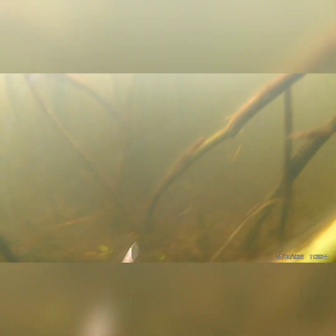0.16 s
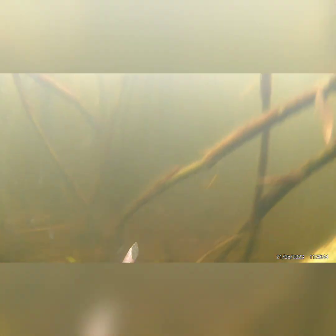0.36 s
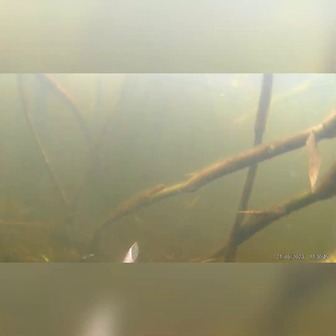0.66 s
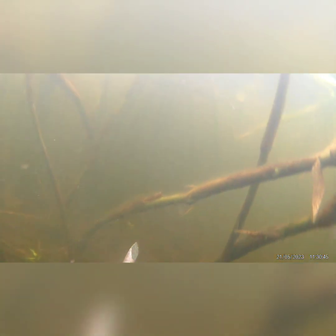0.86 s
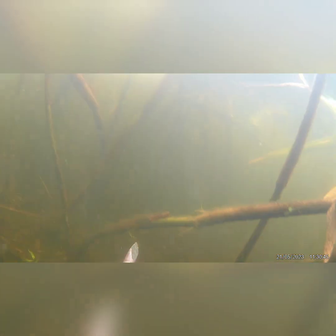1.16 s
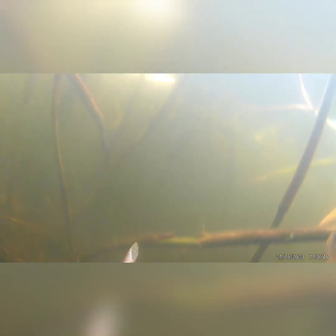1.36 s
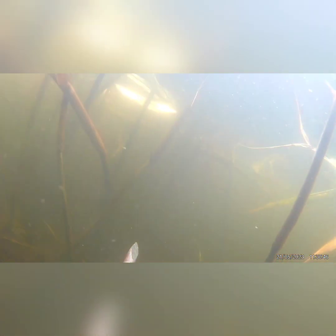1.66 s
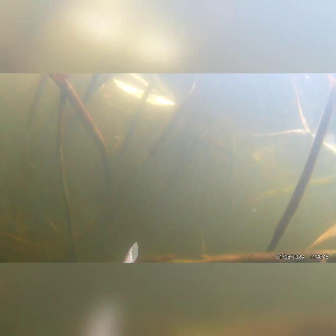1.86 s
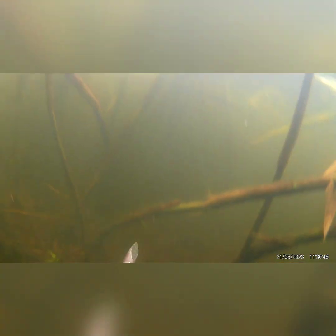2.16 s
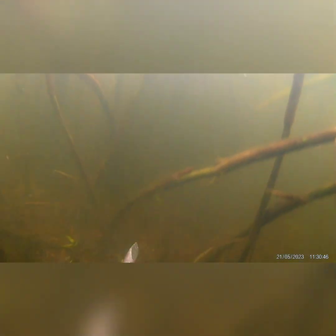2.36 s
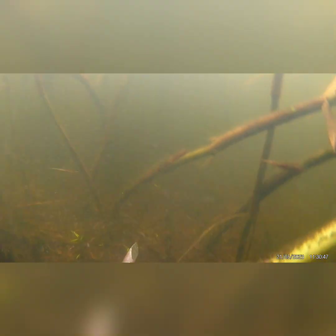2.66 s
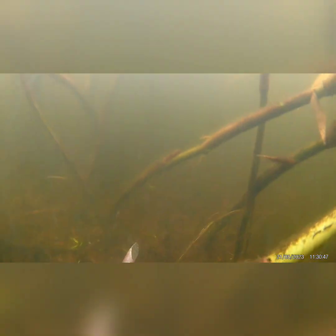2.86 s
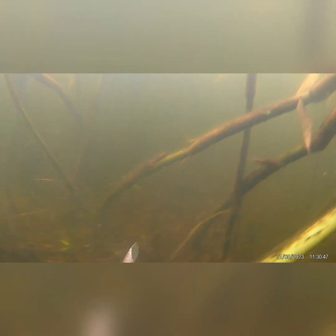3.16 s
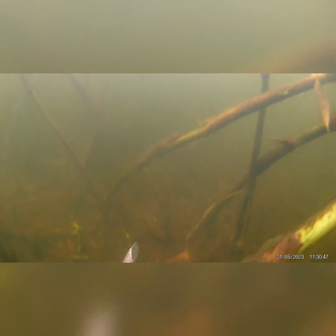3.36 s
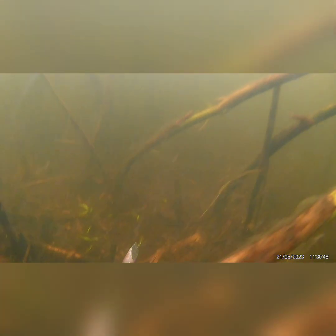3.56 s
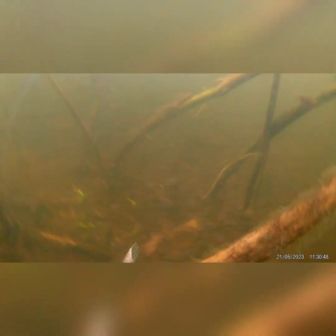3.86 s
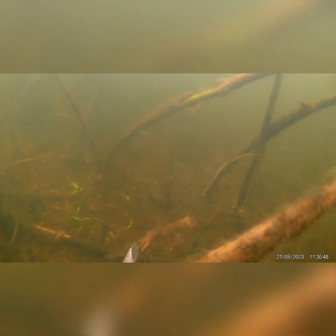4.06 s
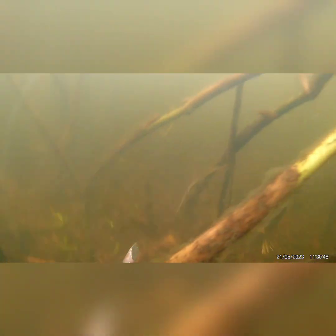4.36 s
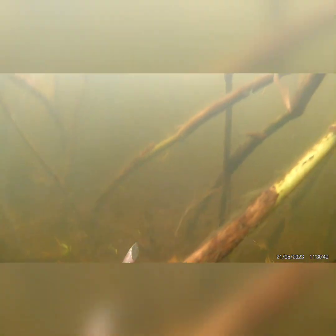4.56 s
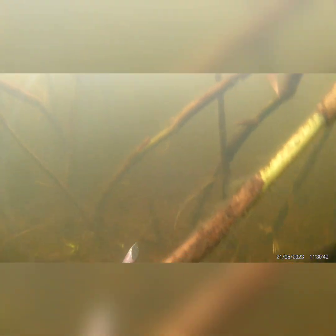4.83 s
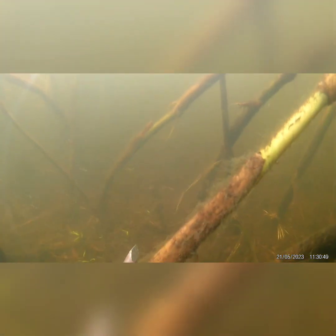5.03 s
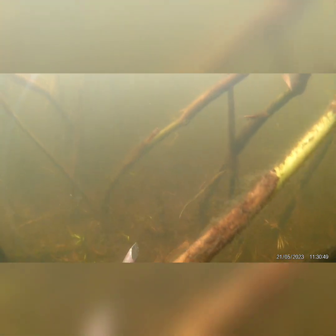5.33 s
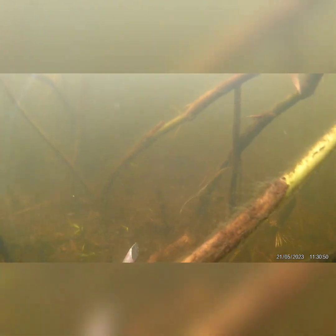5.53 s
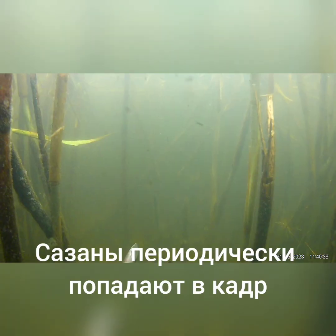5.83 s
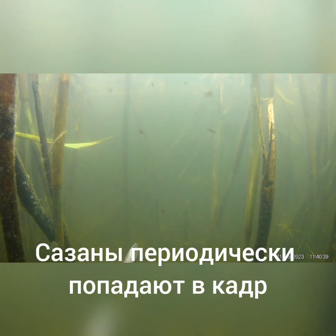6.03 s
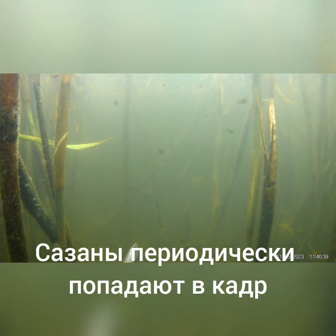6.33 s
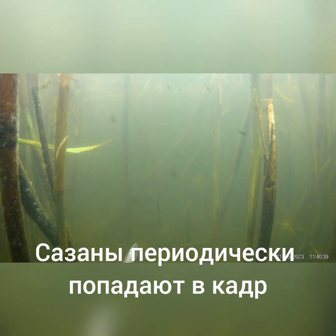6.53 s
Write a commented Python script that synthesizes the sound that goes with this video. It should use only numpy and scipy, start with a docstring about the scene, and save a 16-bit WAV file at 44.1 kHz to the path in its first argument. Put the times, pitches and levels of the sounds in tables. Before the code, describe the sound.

Muffled underwater rumble with deep soft booms and hollow plastic knocks and rubs, growing rougher, then a brief dropout and quiet hiss with one tiny bubble.

```python
"""Among sunken reeds, a camera in a plastic housing drifts underwater. Damped sines near 60 Hz boom as it
is bumped; knocks ring short modes of its lid, rim, back, shell and clack; noise through the same modes
gives the wash of water and the rub of stalks. A stalk squeaks in two slides of harmonic tone. The sound
drops out briefly, then resumes in stiller water, where a small bubble chirps upward over a steady hiss."""
import sys
import numpy as np
from scipy import signal
from scipy.fft import rfft, irfft
from scipy.io import wavfile
from scipy.ndimage import uniform_filter1d

SR = 44100
rng = np.random.default_rng(int(sys.argv[2]) if len(sys.argv) > 2 else 0)


def dump(signal):
    """Clip the signal to [-1, 1] and save it as 16-bit WAV at the path in sys.argv[1]."""
    limited = np.clip(np.atleast_2d(signal).T, -1, 1)
    pcm = np.round(limited * 32767).astype(np.int16)
    wavfile.write(sys.argv[1], SR, pcm)


N = 295029
T = np.arange(N) / SR  # s

# modes of the housing by part: f/Hz, relative level/dB, t60/s of the free ring
LID = [(443, 1.5, 0.061), (397, -12.5, 0.062)]
RIM = [(629.2, 0, 0.036), (692, -5, 0.034), (841, -8, 0.039), (1067, -12.5, 0.01)]
BACK = [(296.6, 4.5, 0.076), (226, -1.5, 0.054)]
SHELL = [(1237, -4.5, .03), (1567, 5.5, 0.013), (1745, 8.5, 0.017), (1849, -12.5, .02), (2315, -11, 0.016),
         (2660, -22, 0.026)]
# the same for the hard clack, as a hard blow sounds it
CLACK = [(2950, -4, .007), (3550, -5, .005), (4200, -2, .006), (4900, -5, .004), (5550, 0, .005),
         (6300, 0, .0045), (7000, -12, .004), (9300, -21, .004), (12000, -24, .0025)]
# water moving past the housing: t/s, sway level/dB, wash level on the body/dB, shell over body/dB
FLOW = [(0, -37, -55, -8), (.2, -36, -52, -35), (.38, -45.5, -63, -13.5), (.85, -52, -61, -13),
        (1.1, -60.5, -68, -9), (1.65, -53, -69, -13.5), (2.1, -54, -67, -11.5), (2.35, -46.5, -66.5, -5.5),
        (2.63, -52, -64, -6), (2.75, -60.5, -65, -16), (2.85, -44, -58.5, -15.5), (3.3, -41.5, -62, -14.5),
        (3.9, -44, -61.5, -17), (4.15, -33, -59.5, -18.5), (4.5, -36, -52, -23), (4.74, -28.5, -54.5, -20),
        (4.86, -41, -57.5, -16), (5.0, -29.5, -58, -19), (5.2, -49, -58, -23), (5.49, -42, -60, -13),
        (5.65, -69.5, -54.5, -24.5), (6.16, -76.5, -59, -22), (6.54, -57, -62, -17.5),
        (6.69, -61.5, -64.5, -18)]


def undb(db):
    """Amplitude factor of a level in dB."""
    return 10 ** (np.asarray(db) / 20)


def level(x, db):
    """Set the rms level in dB."""
    return x * undb(db) / np.sqrt(np.mean(x ** 2))


def band(x, hz, width_hz):
    """Two-pole resonance, gain 1 at the centre."""
    return signal.lfilter(*signal.iirpeak(hz, hz / width_hz, SR), x)


def walk(rate):
    """Random levels held 1 / rate s and smoothed twice into slow slides; spread near 1."""
    hold = int(SR / rate)
    steps = np.repeat(rng.standard_normal(N // hold + 1), hold)
    return 1.5 * uniform_filter1d(uniform_filter1d(steps, hold), hold)[:N]


def add(out, s, sound):
    """Mix a sound in at s seconds."""
    i = int(s * SR)
    out[i:i + len(sound)] += sound[:N - i]


def parts_db(body_db, lid_over_back_db, shell_over_db, clack_over_db, rim_db):
    """Levels of lid, rim, back, shell and clack from where and how hard the housing is touched."""
    lid = body_db + np.minimum(lid_over_back_db, 0)
    back = body_db - np.maximum(lid_over_back_db, 0)
    shell = body_db + shell_over_db
    rim = lid + 0.45 * (shell - lid) + rim_db  # the rim sounds between lid and shell
    return np.array([lid, rim, back, shell, shell + clack_over_db])


def hiss():
    """Steady noise of water and microphone, shaped in its spectrum."""
    # noise colour: f/Hz, relative level per Hz/dB
    colour = [(12, -32.5), (20, 0), (65, -8.5), (85, -3.5), (123, -12.5), (354, -19), (455, -21.5),
              (523, -25), (1550, -31), (1730, -34.5), (2630, -37.5), (7820, -48.5), (15700, -48)]
    hz, db = np.transpose(colour)
    f = np.maximum(np.fft.rfftfreq(N, 1 / SR), 1)
    gain = undb(np.interp(np.log(f), np.log(hz), db))
    return level(irfft(rfft(rng.standard_normal(N)) * gain, N), -58)


def sway():
    """The flow rocks the whole housing: noise through low resonances, swelling with the water."""
    sway_db = np.interp(T, np.array(FLOW)[:, 0], np.array(FLOW)[:, 1])
    flow = rng.standard_normal(N)
    boom = level(band(band(flow, 57, 7), 57, 43), 0)
    under = level(band(band(flow, 37, 12), 37, 30), -9.5)
    return undb(sway_db) * (boom + under)


def rubbed(modes, slips_per_s, smear, flicker_db, evenness):
    """Tiny random slips over turbulence excite a part's modes, damped by the contact; each mode flickers."""
    slips = (rng.random(N) < slips_per_s / SR) * rng.standard_normal(N)
    push = level(slips, 0) + 0.73 * rng.standard_normal(N)
    y = 0
    for hz, db, t60 in modes:
        width = smear / t60  # Hz; more smear, more damping
        mode = band(band(band(push, hz, width), hz, width), hz, 3 * width)
        # evenness below 1 pulls the mode levels together
        y = y + level(mode, db * evenness) * undb(flicker_db * walk(40))
    return level(y, 0)


def rub():
    """Water washes over the parts throughout; stalks slide along them stroke by stroke."""
    # sliding stalks: start t/s, length/s, body level/dB rms, lid over back/dB, shell over body/dB,
    # clack over shell/dB, rim emphasis/dB
    strokes = [(0.055, 0.075, -49.5, 2, -16.5, -5.5, 9), (0.132, 0.076, -45.5, 5, -22.5, -7, 6),
               (0.189, 0.078, -43.5, 3.5, -25.5, -15, 5), (0.271, 0.064, -43, 11, -26, -7, 6.5),
               (0.324, 0.049, -46.5, -10, -31, -17, 4), (0.603, .12, -55, 3.5, -28, -22, 4.5),
               (.71, 0.11, -69, 0, -3, -22, -4), (0.854, 0.052, -55.5, 4, -20, -22, 2),
               (.98, 0.074, -62, -11, -16, -13, 5), (2.18, 0.3, -53, -15, -32, -30, -8),
               (2.676, 0.08, -43.5, 1, -45, -15, 0.5), (2.742, 0.12, -41, 6, -29, -30, -4),
               (2.866, 0.059, -43, 7.5, -35, -19, 1.5), (2.958, 0.031, -42, 3.5, -35, -15.5, -4),
               (3.021, 0.083, -44, -2, -26.5, -19, -1), (3.2, .036, -36, 8.5, -32.5, -21, -4),
               (3.234, 0.11, -44.5, -15.5, -23, -27, 0), (3.533, 0.1, -48, -3, -27, -12, 3),
               (3.589, .045, -40, 12, -37, -14, 3), (3.735, .038, -31, -11.5, -29, -37, 2),
               (3.776, 0.058, -43, -9, -29.5, -27, -8), (3.844, 0.11, -38, -10.5, -25, -24.5, 0),
               (3.95, 0.11, -45, -9.5, -36, -19, -3), (4.075, 0.038, -46, -8, -19.5, -32.5, 2),
               (4.111, 0.056, -56.5, 17.5, -2.5, -34, -9), (4.205, 0.012, -37.5, -4.5, -9.5, -7.5, 3),
               (4.216, 0.032, -45, 18, -16, -26.5, 1), (4.262, .048, -39, -3, -10.5, -45, 0.5),
               (4.32, 0.064, -51.5, 4, -9, -28, -5), (4.379, 0.053, -43.5, 5, -3, -37, 1),
               (4.44, 0.042, -40, -2.5, -8.5, -13.5, -2), (4.638, 0.028, -38.5, -11, -14.5, -18.5, -5),
               (4.669, 0.025, -33, 5.5, -26.5, 1, 2.5), (4.702, 0.024, -35, -3, -39, 4, 3),
               (4.782, .057, -40.5, -0.5, -24, -7, -6), (4.825, .1, -42, -26, -27.5, -13, -15),
               (4.99, .17, -53.5, -7.5, -26.5, -9, 5), (5.212, 0.037, -41, -15, -24.5, -4, -5),
               (5.25, .08, -52.5, 16, -33, -18, -1.5), (5.336, 0.088, -48, -7, -20, -24, 1.5),
               (5.42, 0.077, -52.5, -1.5, -9, -23, -4)]
    # flicker depth of lid, rim, back, shell and clack/dB
    flicker = (1.8, 1.8, 1.8, 2.2, 2.2)
    s, _, wash_db, shell_over_db = np.transpose(FLOW)
    # lid over back 2 dB, rim emphasis 1 dB
    wash = parts_db(np.interp(T, s, wash_db), 2, np.interp(T, s, shell_over_db), 0, 1)
    wash[-1] = -91.5  # dB; water barely stirs the clack
    power = undb(wash) ** 2
    for start, length, *touch in strokes:
        power[:, int(start * SR):int((start + length) * SR)] += undb(parts_db(*touch))[:, None] ** 2
    # 13 ms smoothing eases each stroke in and out
    lid, rim, back, shell, clack = uniform_filter1d(np.sqrt(power), int(.013 * SR), axis=1)
    return (lid * rubbed(LID, 360, 5.2, flicker[0], 0.78)
            + rim * rubbed(RIM, 500, 5, flicker[1], 0.87)
            + back * rubbed(BACK, 330, 9.2, flicker[2], 0.4)
            + shell * rubbed(SHELL, 600, 5.0, flicker[3], 0.72)
            + clack * rubbed(CLACK[:3], 900, 2.5, flicker[4], 0.029))


def bubble():
    """A rising chirp whose octave fades out early in the climb."""
    # path of the chirp: t/s, f/Hz, level of the fundamental/dB
    chirp = [(6.085, 933, -78.5), (6.095, 1015, -55.5), (6.108, 1094, -68), (6.118, 1245, -51),
             (6.126, 1504, -71), (6.134, 1950, -63), (6.138, 2100, -85)]
    s, hz, db = np.transpose(chirp)
    phase = 2 * np.pi * np.cumsum(np.interp(T, s, hz)) / SR
    octave = 1.1 * np.clip((s[3] - T) / 0.037, 0, 1)
    tone = np.sin(phase) + octave * np.sin(2 * phase)
    return undb(np.interp(T, s, db, -200, -200)) * tone


def squeaks():
    """A stalk's uneven stick-slip on the shell: a rough tone, its first two harmonics equally strong."""
    # two slides: t/s, mean slip rate f/Hz, level ahead of the harmonic balance/dB
    slides = [(4.231, 1020, -79), (4.245, 962, -48.5), (4.258, 873, -61), (4.267, 783.5, -46),
              (4.284, 687.5, -33), (4.295, 736, -38.5), (4.305, 886, -45), (4.313, 900, -88),
              (4.37, 860, -85), (4.381, 853, -56), (4.399, 751, -56), (4.406, 787, -41.5),
              (4.419, 828, -38.5), (4.433, 820, -50), (4.44, 800, -99)]
    s, hz, db = np.transpose(slides)
    slip_hz = np.interp(T, s, hz) * (1 + 0.013 * walk(460))
    phase = 2 * np.pi * np.cumsum(slip_hz) / SR
    tone = 0
    for k, harmonic_db in enumerate([-1.0, -1, -15, -33.5], start=1):
        tone = tone + undb(harmonic_db + 2 * walk(150)) * np.sin(k * phase)
    return undb(np.interp(T, s, db, -200, -200)) * tone


def thumps():
    """Soft bumps set the whole housing into damped rocking that starts a little fast and settles."""
    # bumps: t/s, level at the start of the decay/dB, settled f/Hz, t60/s
    bumps = [(0.047, -46, 54, 0.25), (0.2, -26.5, 61.26, 0.74), (0.248, -34, 63, 0.52),
             (0.577, -37.5, 62.7, 0.63), (0.959, -43.5, 67.2, 0.96), (1.461, -46, 63, 0.7),
             (1.702, -44, 64.2, 1), (2.204, -30.5, 60.1, 0.43), (2.307, -38, 64, 0.81),
             (2.657, -21, 70.8, 0.29), (2.67, -10, 61.3, 0.74), (2.936, -32, 70.8, 0.79),
             (3.289, -27.5, 56.8, 1), (3.522, -23, 61, 0.88), (3.765, -21, 63.5, 0.42),
             (3.906, -10.5, 56, 0.26), (3.945, -18.5, 61.75, 0.79), (4.091, -33.5, 59.2, 0.35),
             (4.208, -21.5, 71, 0.41), (4.437, -17, 75.35, 0.23), (4.45, -3.5, 63, 0.13),
             (4.466, -6.5, 57.2, 0.35), (4.557, -24, 62.9, 0.35), (4.673, -16.5, 57.7, 0.18),
             (4.716, -28, 61, 0.36), (4.801, -39, 67.3, 0.5), (4.963, -15, 75, 0.095),
             (5.217, -5.5, 61.2, 0.37), (5.389, -27.5, 60.9, 0.39), (6.61, -47, 52.4, 0.45)]
    out, t = np.zeros(N), T[:SR]
    for s, db, hz, t60 in bumps:
        turns = hz * (t + 0.00092 * (1 - np.exp(-t / 0.022)))
        onset = 1 - np.exp(-t / 0.0015)
        add(out, s, undb(db - 60 * t / t60) * np.sin(2 * np.pi * turns) * onset)
    return out


def ring(modes, chance, rise_s, detune):
    """One blow on one part; where it lands shifts the balance of the modes. Peak 1."""
    t = T[:SR // 8]
    hz, db, t60 = np.transpose(modes)[:, :, None]
    scatter_db = 3 * chance[:len(modes), None]
    pitch = hz * (1 + detune * chance[-len(modes):, None])
    y = np.sum(undb(db + scatter_db - 60 * t / t60) * np.sin(2 * np.pi * pitch * t), axis=0)
    y *= np.sin(np.pi / 2 * np.minimum(t / rise_s, 1)) ** 2  # the push builds up over the contact
    return y / np.abs(y).max()


def dulled(modes, softness_db):
    """A soft blow leaves the upper modes weak."""
    hz, db, t60 = np.transpose(modes)
    loss_db = 0.45 * max(softness_db, 0) * np.log2(hz / hz[0])  # grows per octave above the first mode
    return np.transpose([hz, db - loss_db, t60])


def crunch(y, grit):
    """A rough surface lands as a quick burst of tiny contacts. Peak 1."""
    burst = grit * np.exp(-T[:len(grit)] / 0.0002)
    y = signal.fftconvolve(y[:SR // 20], burst)
    return y / np.abs(y).max()


def knocks():
    """Stalks and gear ring all five parts; shell and clack answer fastest and feel the contact's grit."""
    # knocks: t/s, body peak level/dB, lid over back/dB, shell over body/dB, clack over shell/dB
    blows = [(0.335, -31, 0.5, -33, -2), (0.513, -65, -4, 15.5, -21), (0.88, -52, 9, -17, -20),
             (1.0, -54, 12, -6, -20), (1.508, -38, 12, -6, -12), (2.305, -39.5, 12, -23, -4),
             (2.660, -20.5, 9.5, 5.5, -31), (2.664, -10, 6, -20.5, -31.5), (2.743, -27, -6, -6, -40),
             (2.871, -30, -7, -32, -14), (2.915, -28.5, 2, -19, -25), (2.946, -17.5, -3, -20.5, -29),
             (3.177, -14, 9.5, -9.5, -38), (3.214, -44.5, -4.5, 0.5, -23), (3.247, -23, -5, -38, -11),
             (3.299, -26, 7, -17, -28.5), (3.433, -38, 9.5, -15.5, -19), (3.461, -37.5, 5, -10, -23),
             (3.523, -34, 2, -21, -16), (3.567, -33.5, 0, -2.5, -32), (3.616, -33.5, 23.5, -35, -10),
             (3.748, -17.5, -1.5, -20.5, -35), (3.883, -31, 16, -9, -16.5), (3.917, -26.5, 27, -22.5, -30),
             (3.981, -38.5, 18, -11.5, -27), (4.208, -36.5, -7, -0.5, -10),
             (4.242, -27.5, -25.5, -17, -51.5), (4.435, -37, 1, -8.5, -11), (4.451, -25.5, 7, -11, -10),
             (4.458, -43, 1.5, -6, -5), (4.474, -38, 2.5, -8.5, -9), (4.551, -29, 5, -23, -15),
             (4.717, -23, 12.5, -28.5, -10), (4.815, -23, 16.5, -26, -10), (4.833, -37.5, -7, -6, -37),
             (4.925, -32.5, 3.5, -16, 14), (4.933, -33, 25, 1, 7.5), (4.938, -38, 7, -12, 14),
             (4.9561, -4, 23, -4.5, 5), (4.965, -25.5, 18, -6, 3.5), (4.975, -34, 5, -13, -3),
             (5.003, -63.5, -6, 11.5, -5.5), (5.009, -49, 14.5, 2, -7.5), (5.043, -31.5, -2.5, -29, -8),
             (5.164, -27, -6.5, -20, 1.5), (5.171, -1.5, 14, -21, -12), (5.179, -12.5, 0, -34.5, 2.5),
             (5.1847, -28.5, 10, 11, 1), (5.198, -25, 2, 4.5, -17.5), (5.22, -30, 8, -10.5, -17.5),
             (5.39, -36.5, 14, -16, -13)]
    out = np.zeros(N)
    chance = np.clip(rng.standard_normal((len(blows), 5, 18)), -2, 2)
    grit = rng.standard_normal((len(blows), 2, 400))
    # per part: lid, rim, back, shell, clack
    detune = (.012, .03, .03, .02, .015)
    rise = (1.1, 0.59, 1.4, 0.33, 0.34)  # in contact times
    contact_s = 2.95 / 1000
    hard_clack_db = -38  # a quieter clack is duller
    for (s, *touch), draws, g in zip(blows, chance, grit):
        levels_db = parts_db(*touch, -3.5)  # rim emphasis in dB
        clack = dulled(CLACK, hard_clack_db - levels_db[-1])
        parts = (LID, RIM, BACK, SHELL, clack)
        rings = [ring(part, c, r * contact_s, d) for part, c, r, d in zip(parts, draws, rise, detune)]
        rings[3:] = crunch(rings[3], g[0]), crunch(rings[4], g[1])
        for y, db in zip(rings, levels_db):
            add(out, s, undb(db) * y)
    return out


def scene():
    """All the layers in one channel."""
    return (thumps() + knocks() + sway() + rub() + squeaks() + bubble() + hiss())[None]


def record(dry):
    """The input rounds off the loudest peaks; the sound drops out for a moment; both extremes are cut."""
    # dropout: start and end t/s
    silent = (5.492, 5.645)
    on = np.clip(np.maximum(silent[0] - T, T - silent[1]) / 0.0036, 0, 1)  # 3.6 ms fades
    soft = dry / (1 + np.abs(dry / .85) ** 4) ** .25
    kept = signal.sosfilt(signal.butter(1, 12, "high", fs=SR, output="sos"), soft * on)
    return signal.sosfilt(signal.ellip(10, .2, 70, 15750, fs=SR, output="sos"), kept)


dry = scene()
out = record(dry)
dump(out)
```